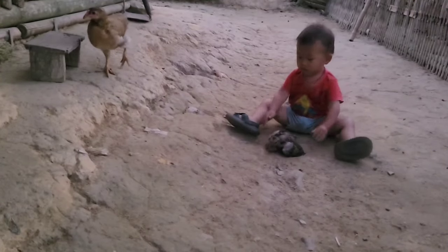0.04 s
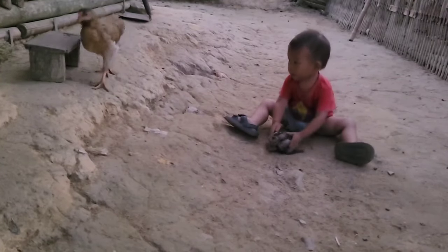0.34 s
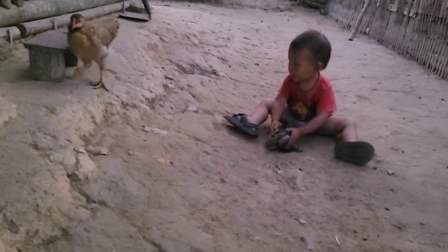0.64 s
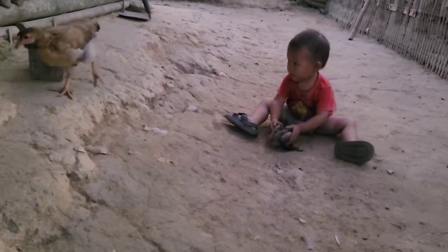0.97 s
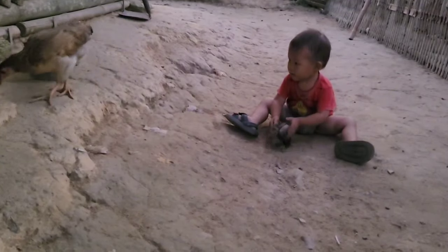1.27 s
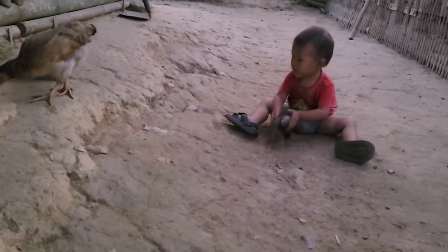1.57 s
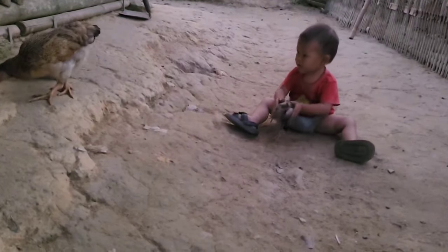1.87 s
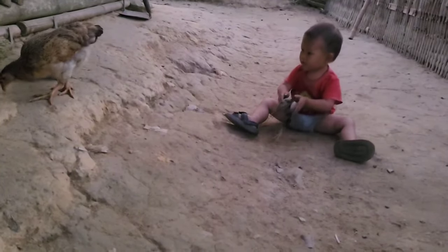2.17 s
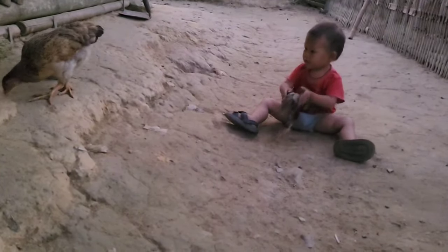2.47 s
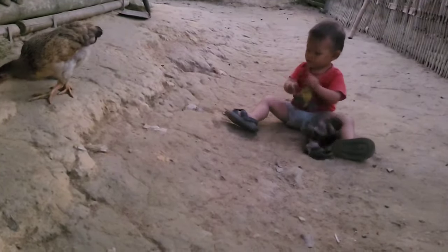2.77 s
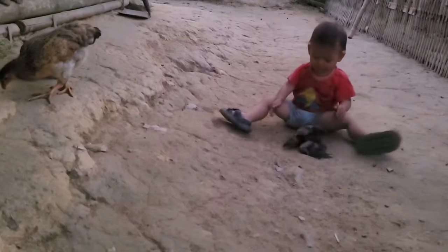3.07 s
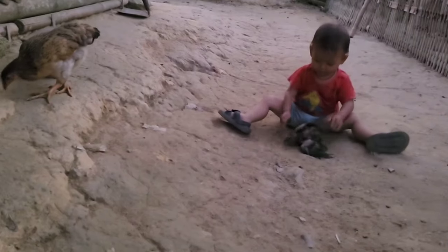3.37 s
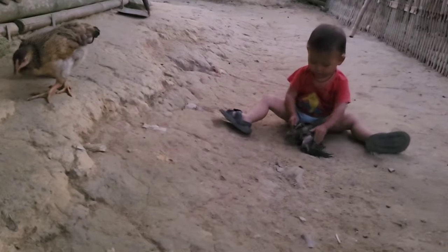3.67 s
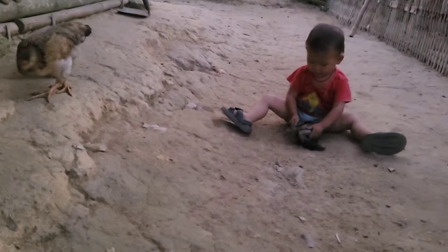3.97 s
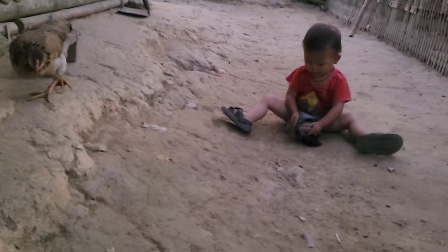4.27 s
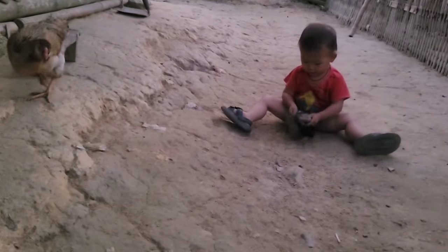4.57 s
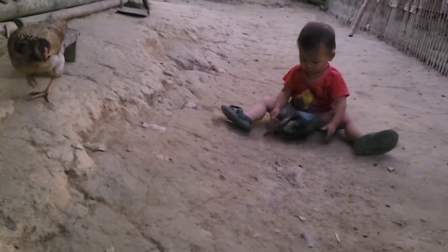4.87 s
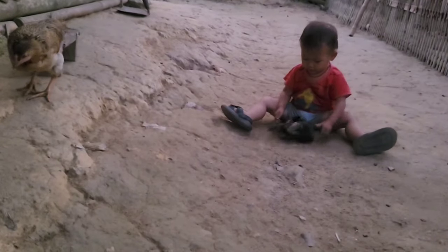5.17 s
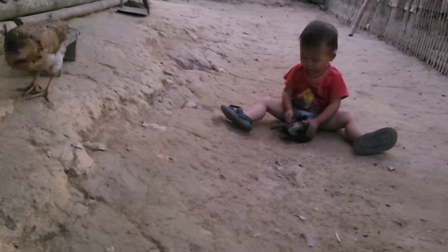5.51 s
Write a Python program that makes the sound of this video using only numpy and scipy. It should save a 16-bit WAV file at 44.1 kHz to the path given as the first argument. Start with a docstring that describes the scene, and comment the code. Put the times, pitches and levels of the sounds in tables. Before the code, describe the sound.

A hen gives three falling caws, the last a squawk, amid faint chick peeps, dirt scuffs, one dry snap and short scrapes.

```python
"""A hen in a dirt yard, between a house and a fence, draws out three falling caws, the last breaking into
a squawk: her syrinx sings harmonics through her throat and rasps as she strains. Young birds peep around
her, some further off. Something is scraped over the ground in short even strokes, feet scuff, small
things click and one dry snap sounds close by. A stereo microphone, its two ports unlike in colour,
takes it all in with the returns from the yard, over faint air and a steady high hiss."""
import sys
import numpy as np
from scipy import signal
from scipy.fft import rfft, irfft, next_fast_len
from scipy.io import wavfile
from scipy.ndimage import uniform_filter1d

SR = 44100
rng = np.random.default_rng(int(sys.argv[2]) if len(sys.argv) > 2 else 0)


def inscribe(sig):
    """Save sig as 16-bit PCM at rate SR to the path in sys.argv[1].

    A 1-D sig is mono; a 2-D sig holds one channel per row.
    Samples are clipped to [-1, 1] before scaling.
    """
    pcm = np.round(np.clip(np.atleast_2d(sig).T, -1, 1) * 32767)
    wavfile.write(sys.argv[1], SR, pcm.astype(np.int16))


N = 244314
T = np.arange(N) / SR
FREQ = np.fft.rfftfreq(N, 1 / SR) + 1

# Spectra of the open air and the high hiss. Each row: frequency in Hz, relative level in dB.
AIR_COLOUR = [(20, -48), (35, -44), (58, 7), (85, -10), (130, -1), (200, -14.5), (300, -6.5), (550, -5),
              (900, -7), (1250, -10.5), (2000, -0.5), (3000, -8), (4300, 1), (5200, -11), (7000, -39)]
HISS_COLOUR = [(3000, -19), (4200, -27.5), (5100, -16.5), (5700, -3), (6300, 3.5), (6800, -2.5),
               (7400, -18.5), (9000, -20.5), (11000, -22.5), (12600, -16), (14200, -29.5), (15800, -37)]
# Feet on the dirt. Each row: peak time in seconds, level in dB, rise in seconds, decay in seconds,
# treble tilt in dB an octave.
SCUFFS = [(.34, -51, 0.013, 0.0061, 4.5), (.41, -57.5, 0.068, 0.16, 1), (.5, -60, 0.13, 0.27, 9),
          (.655, -49.5, 0.059, 0.029, 1), (.802, -50.5, .005, .016, 0.5), (.836, -49, 0.014, 0.05, 1),
          (.928, -55, 0.016, 0.12, 1), (1.07, -64.5, 0.048, 0.024, 7.5), (1.16, -56.5, 0.047, 0.057, -1),
          (1.47, -63, .12, 0.032, 2), (1.65, -53, 0.055, 0.088, 2), (1.83, -55.5, 0.01, 0.023, 0.5),
          (2.382, -50, 0.0026, 0.027, 2), (2.612, -50.5, 0.0076, 0.014, 9.5),
          (2.636, -52, 0.0044, 0.017, 3), (2.76, -56.5, 0.016, 0.056, 5), (3.19, -52, 0.032, 0.037, 7),
          (3.87, -55, .026, 0.024, 8.5), (4.41, -60, 0.024, 0.051, 3.5), (4.535, -59, 0.024, 0.027, 5),
          (4.86, -58, .04, 0.032, 4)]
# Scraping strokes. Each row: peak time in seconds, level in dB, rise plus decay in seconds.
STROKES = [(2.677, -38.5, 0.037), (3.119, -38, 0.047), (3.752, -39.5, .041), (4.184, -37, .033),
           (4.612, -39, 0.038), (5.055, -40, 0.035), (5.484, -42, 0.039)]
# Spectra of the grit in a scuff and a stroke. Each row: frequency in Hz, relative level in dB.
SCUFF_COLOUR = [(60, -15), (150, -5), (300, 2), (700, 0.5), (1100, -2), (1800, 2.5), (2800, -5.5),
                (4500, -13.5), (8000, -20), (15000, -31.5)]
STROKE_COLOUR = [(25, -26), (70, -10), (150, -8.5), (280, -4.5), (550, -5.5), (800, -1), (1150, -2.5),
                 (1650, 0), (2700, -6), (4200, -6), (6400, -10.5), (9700, -8), (12800, -13.5), (15800, -19)]
# Small knocks. Each row: start in seconds, level in dB, centre in Hz, decay in seconds.
CLICKS = [(.336, -46, 1530, .003), (.825, -49, 1930, .0037), (1.1409, -41.5, 1730, 0.0035),
          (1.142, -51.5, 10970, 0.013), (1.168, -54, 11200, 0.0074), (1.239, -44, 1800, 0.002),
          (2.608, -46.5, 2470, 0.0029), (2.6486, -41.5, 1960, 0.004), (2.758, -51, 580, 0.0041),
          (3.123, -45, 260, 0.023), (4.799, -54, 1490, 0.0021)]
# Modes of the thing that snaps. Each row: frequency in Hz, relative level in dB, seconds to fall 60 dB.
SNAP_MODES = [(319, -28, 0.064), (378, -36, 0.035), (828, 0, 0.079), (1430, -12, 0.025), (1607, 4, 0.048),
              (2305, 0, 0.049), (2340, 1.5, 0.061), (3800, 2, .016), (4400, 2, .014), (7880, 9.5, 0.013),
              (9770, 12.5, 0.013)]
# Spectra of the snap's cracks and its thud. Each row: frequency in Hz, relative level in dB.
CRACK_COLOUR = [(30, -50), (170, -29.5), (310, 7), (620, -8.5), (1000, -10), (1500, -1), (3000, -15),
                (3900, 5.5), (5500, -12.5), (8000, -8.5), (10300, -2.5), (11500, -14), (15500, -14)]
THUD_COLOUR = [(30, -37), (110, -12), (200, -15.5), (330, -6), (460, -7), (620, -11), (2000, -14),
               (6000, -17), (15000, -25)]
# The nearer young birds. Each row: start in seconds, length in seconds, starting pitch in Hz,
# glide in octaves, level in dB, roughness (0 is clear, capped at 1).
NEAR_PEEPS = [(0, .05, 1780, 0.02, -64.5, 0.52), (.237, 0.013, 1690, .45, -45.5, 0.8),
              (.255, 0.056, 2454, -0.03, -49.5, 1), (.334, .1, 3210, -0.64, -63, 1.1),
              (.455, 0.037, 1683, -0.2, -55.5, 0.8), (.822, 0.039, 3000, -.12, -57.5, .5),
              (.826, 0.031, 1794, -0.2, -50, 1.2), (1.078, 0.044, 2115, -0.16, -59, 0.15),
              (1.307, 0.094, 2120, -0.12, -59.5, .18), (1.624, .035, 2033, -0.04, -59.5, 0),
              (2.042, 0.059, 2063, -0.18, -61.5, 0.5), (2.226, .065, 1876, -0.08, -63, 0.94),
              (2.765, .08, 2046, -0.1, -63.5, 0.34), (3.647, .048, 1664, -.39, -57, 0.3),
              (3.659, 0.044, 2968, -0.32, -57.5, 0.94), (3.72, 0.056, 2550, -0.16, -54.5, .4),
              (3.828, 0.062, 3210, -0.32, -65.5, .6), (3.929, 0.034, 2154, -0.38, -54.5, 0.7),
              (4.123, 0.0613, 3390, -0.4, -65, 0.75), (4.396, 0.026, 1236, -0.2, -56, 0.7)]
# The hen's throat resonances. Each row: centre in Hz, width in Hz, relative level in dB.
THROAT_RESONANCES = [(1670, 620, -16), (1990, 610, -3.5), (2780, 860, -5), (3340, 200, -9),
                     (3460, 920, -14), (4225, 260, -3)]
# Spectrum of her rasp. Each row: frequency in Hz, relative level in dB.
RASP_COLOUR = [(300, -60), (700, -2), (1100, -8), (1500, 3), (1900, 8), (2300, 5), (2650, -23), (3000, -4),
               (4500, -10.5), (8000, -24)]
# The course of each caw. Each row: time in seconds, pitch in Hz, relative level of the fundamental
# in dB, relative level of the overtones in dB.
HOARSE_CAW = [(0.43, 545, -79, -74), (0.44, 563.5, -55.5, -64), (0.484, 523.3, -52, -53.5),
              (0.52, 529, -44, -68), (0.542, 475.6, -55, -56.5), (0.602, 480.6, -63.5, -77),
              (0.63, 523, -59, -74)]
CLEAR_CAW = [(0.86, 452, -67, -51), (0.878, 463, -53, -46), (0.91, 558, -52.5, -60),
             (0.96, 500, -53.5, -54.5), (1.018, 510, -71, -54.5), (1.07, 497.5, -49.5, -58),
             (1.198, 487.6, -58, -57.5), (1.27, 447, -60.5, -60.5), (1.302, 460, -72, -79),
             (1.322, 418, -53.5, -78), (1.345, 349, -72, -74)]
LONG_CAW = [(2.972, 784, -67, -98), (2.986, 780, -50, -80), (3.052, 772, -49.5, -53),
            (3.216, 739.3, -47.5, -55.5), (3.266, 704.5, -53, -69), (3.43, 697, -52.5, -62),
            (3.678, 644.7, -62, -67.5), (3.714, 626.7, -60, -81), (3.754, 619.4, -53.5, -56),
            (3.792, 578, -69, -77), (3.85, 417.2, -63.5, -83)]
# How the microphone's ports differ. Each row: frequency in Hz, left minus right in dB.
PORT_BALANCE = [(100, -2.5), (700, -1.5), (1400, -4.5), (2200, -6), (3500, 9.5), (4400, -2), (5700, 7),
                (6500, -6), (7500, -15), (9300, 1), (10500, -1.5), (12500, 17), (14000, 9), (15800, 9)]


def undb(db):
    """Decibels to gain."""
    return 10 ** (np.asarray(db) / 20)


def unit(x):
    """Scale to an rms of one."""
    return x / np.sqrt(np.mean(x ** 2))


def shape(points):
    """Decibels at every frequency from (Hz, dB) points."""
    hz, db = np.transpose(points)
    return np.interp(np.log(FREQ), np.log(hz), db)


def noise(db, alike_hz=750, likeness=0.87):
    """Stereo noise of a given colour; long waves reach both ports alike."""
    mid, side = rfft(rng.standard_normal((2, N)))
    alike = likeness / (1 + (FREQ / alike_hz) ** 4)
    both = mid * np.sqrt(1 + alike) + np.array([[1], [-1]]) * side * np.sqrt(1 - alike)
    return unit(irfft(both * undb(db), N))


def colour(x, points):
    """Causal filter with a (Hz, dB) shape of unit power."""
    cepstrum = irfft(np.log(unit(undb(shape(points)))), N)
    cepstrum[1:] *= 2 * (np.arange(1, N) < N // 2)
    return irfft(rfft(x) * np.exp(rfft(cepstrum)), N)


def walk(rate_hz):
    """Smooth random motion with a spread of one."""
    span = max(int(SR / rate_hz), 2)
    steps = np.repeat(rng.standard_normal(N // span + 1), span)
    return unit(uniform_filter1d(steps, span)[:N])


def burst(start, decay):
    """A sudden onset that dies away."""
    return (T >= start) * np.exp(-np.clip((T - start) / decay, 0, 40))


def swell(start, attack_s, hold_s, release_s):
    """An envelope that rises to one, holds and dies away."""
    rise = np.clip((T - start) / attack_s, 0, 1)
    return rise * np.exp(-np.clip((T - start - attack_s - hold_s) / release_s, 0, 40))


def yard(x, wet_db, t60, dull_hz=5000):
    """Scattered returns from ground, wall and fence, duller than the direct sound, unlike at each port."""
    t = T[:SR // 2]
    returns = rng.standard_normal((2, len(t))) * (rng.random((2, len(t))) < .02)
    tail = returns * undb(-60 * t / t60) * (t > .002)
    tail /= np.sqrt(np.sum(tail ** 2, axis=1, keepdims=True))
    tail = signal.lfilter(*signal.butter(1, dull_hz, fs=SR), tail)
    return x + undb(wet_db) * signal.fftconvolve(x * np.ones((2, 1)), tail, axes=1)[:, :N]


def background(air_db=-66.5, hiss_db=-59):
    """Faint outdoor air whose octave bands swell and sink, and a steady narrow hiss."""
    spectrum = rfft(noise(shape(AIR_COLOUR)))
    drift_db, air = .8 * walk(12), 0
    octave = np.clip(np.log2(FREQ / 250), 0, 5)
    for k in range(6):
        band = irfft(spectrum * np.maximum(1 - abs(octave - k), 0), N)
        air += band * undb(air_db + drift_db + 1.6 * walk(11))
    hiss = undb(hiss_db + .5 * walk(14)) * noise(shape(HISS_COLOUR))
    return air + hiss


def rubs(rows, grit_colour, grain_db, hold_s=0.0023):
    """Dense grit noise that swells as contact grows and dies as the foot or stroke stops."""
    out = np.zeros((2, N))
    source = noise(shape(grit_colour)) * undb(grain_db * walk(1500))
    for peak, db, rise, decay, tilt_db in rows:
        on = (T > peak - 3 * rise) & (T < peak + 8 * decay)
        t = T[on] - peak
        size = next_fast_len(len(t))
        tilt = undb(tilt_db * np.log2(np.fft.rfftfreq(size, 1 / SR) + 100))
        grit = unit(irfft(rfft(source[:, on], size) * tilt, size)[:, :len(t)])
        contact = np.where(t < 0, np.exp(-(t / rise) ** 2), np.exp(-np.maximum(t - hold_s, 0) / decay))
        out[:, on] += undb(db) * grit * contact
    return out


def scrapes(rise_share=.39, tilt_db=0.17):
    """Short strokes over the ground, all of one shape and colour."""
    rows = [(s, db, rise_share * span, (1 - rise_share) * span, tilt_db) for s, db, span in STROKES]
    return rubs(rows, STROKE_COLOUR, grain_db=1.5)


def clicks(skirt_db=7):
    """Small knocks on the ground: a short burst around its own pitch with a shorter ring."""
    out = 0
    for start, db, hz, decay in CLICKS:
        body = burst(start, decay) * noise(-skirt_db * np.log2(FREQ / hz) ** 2)
        ring = burst(start, decay / 2) * np.sin(2 * np.pi * hz * (T - start))
        out += undb(db) * (body + ring)
    return out


def snap(start=1.9977, gap_s=.0009, step_db=-2):
    """Close to the microphone something gives way: five ever weaker cracks, a short ring, a dull thud."""
    run = sum(undb(k * step_db) * burst(start + k * gap_s, 0.0022) for k in range(5))
    cracks = colour(run * noise(0), CRACK_COLOUR)
    age = T - start - np.array([[.00012], [0]])  # the ring reaches the left port a moment later
    ring = sum(undb(db) * burst(start, t60 / np.log(1000)) * np.cos(2 * np.pi * hz * age)
               for hz, db, t60 in SNAP_MODES)
    thud = colour(burst(start, 0.013) * noise(0), THUD_COLOUR)
    lean_right = undb([[-2], [1]])
    return (undb(-27) * cracks + undb(-36) * (ring + thud)) * lean_right


def peeps(far_per_s=2.5, far_hz=2126, far_db=-68.5):
    """Thin, mostly falling calls of young birds, clear or scratchy; fainter ones come from further off."""
    out = np.zeros(N)
    flutter = undb(4.5 * walk(220))
    wobble = .06 * walk(600)
    far_peeps = [((k + when) / far_per_s, 0.076, far_hz * 2 ** (octave - .5), -0.155, far_db, 0.53)
                 for k, (when, octave) in enumerate(rng.random(size=(20, 2)))]
    for start, length, start_hz, glide, db, rough in list(NEAR_PEEPS) + far_peeps:
        on = (T > start) & (T < start + length)
        progress = (T[on] - start) / length
        hz = start_hz * 2 ** (glide * progress) * (1 + min(rough, 1) * wobble[on])
        gate = np.sin(np.pi * progress) ** 0.043
        out[on] += undb(db) * gate * np.sin(2 * np.pi * np.cumsum(hz) / SR)
    return yard(out * flutter, wet_db=2.3, t60=0.19)


def shriek(lag_s, top_hz=1466, scoop_hz=100, beat_hz=64, level_db=-33):
    """Pressed hard, the other side of the syrinx screams near the long caw's octave and throbs."""
    effort = swell(3.0, attack_s=0.0363, hold_s=.09, release_s=0.019)
    hz = top_hz - scoop_hz * (1 - effort)  # scoops up, then sinks as it fades
    phase = 2 * np.pi * (np.cumsum(hz) / SR - hz * np.array([[lag_s], [0]])) + 0.49 * walk(260)
    throb = 1 + 0.31 * np.sin(2 * np.pi * beat_hz * T + walk(40))
    gain = undb(level_db + walk(180) + np.array([[.5], [-.5]]))
    tone = np.sqrt(2) * (np.sin(phase) + undb(-25) * np.sin(2 * phase))
    return effort * gain * throb * tone


def caw(curve, lag_s, second_db, upper_db, flutter_db, jitter, hoarseness, rasp_db, strain_db, strain_s):
    """The syrinx sings harmonics through the throat, with a rasp on every cycle that grows under strain."""
    times, *columns = np.transpose(curve)
    hz, fundamental_db, overtone_db = (np.interp(T, times, column) for column in columns)
    gate = np.clip(np.minimum(T - times[0], times[-1] - T) / 0.005, 0, 1)
    strain = swell(times[0], attack_s=0.06, hold_s=strain_s, release_s=0.016)  # she forces the start
    cycles = np.cumsum(hz * (1 + jitter * (walk(170) + walk(45)))) / SR
    phase = 2 * np.pi * (cycles - hz * np.array([[lag_s], [0]]))  # the left port trails by lag_s
    shake = hoarseness * walk(230)  # uneven cycles blur the overtones and spare the fundamental
    voice = undb(fundamental_db + 1 + flutter_db * walk(50)) * np.sin(phase)
    voice += undb(overtone_db + second_db + 0.87 * walk(190)) * np.sin(2 * phase + shake)
    for k in range(3, 7):
        throat = sum(undb(db) / (1 + (2 * (k * hz - centre) / width) ** 2) ** 2
                     for centre, width, db in THROAT_RESONANCES)
        voice += undb(overtone_db + upper_db + 3.6 * walk(45)) * throat * np.sin(k * (phase + shake / 3))
    pulses = 1 + 0.61 * np.cos(phase)
    rasp = undb(rasp_db + strain_db * strain) * noise(shape(RASP_COLOUR)) * pulses
    return gate * (np.sqrt(2) * voice + rasp)


def hen(low_lag_s=-.00007, long_lag_s=.0002):
    """A hoarse and a clear low caw from one side of the microphone, the long squawk from the other."""
    hoarse = caw(HOARSE_CAW, low_lag_s, second_db=5.5, upper_db=-20, flutter_db=4.5,
                 jitter=.028, hoarseness=1.0, rasp_db=-73, strain_db=1, strain_s=.01)
    clear = caw(CLEAR_CAW, low_lag_s, second_db=-0.5, upper_db=-19, flutter_db=3.5,
                jitter=0.00685, hoarseness=.22, rasp_db=-76, strain_db=23, strain_s=0.016)
    long = caw(LONG_CAW, long_lag_s, second_db=1, upper_db=9.5, flutter_db=1.8,
               jitter=0.0037, hoarseness=0.26, rasp_db=-62, strain_db=17.5, strain_s=0.13)
    low_caws = yard(hoarse + clear, wet_db=-5.5, t60=0.31)
    squawk = yard(long, wet_db=-14.5, t60=0.31) + yard(shriek(long_lag_s), wet_db=-3, t60=0.15)
    return low_caws + squawk


def scene():
    """Birds, ground noises and air as they arrive at the microphone."""
    ground = scrapes() + rubs(SCUFFS, SCUFF_COLOUR, grain_db=0.5) + clicks()
    birds = hen() + peeps()
    return birds + yard(ground, wet_db=-14, t60=0.32) + yard(snap(), wet_db=-21, t60=0.37) + background()


def record(dry, top_hz=15850):
    """Each microphone port colours the sound; the top is cut off."""
    ports = undb(np.array([[.5], [-.5]]) * shape(PORT_BALANCE))
    ports /= np.sqrt(np.mean(ports ** 2, axis=0))
    lowpass = signal.ellip(10, .2, 70, top_hz, fs=SR, output="sos")
    return signal.sosfilt(lowpass, irfft(rfft(dry) * ports, N))


dry = scene()
out = record(dry)
inscribe(out)
```